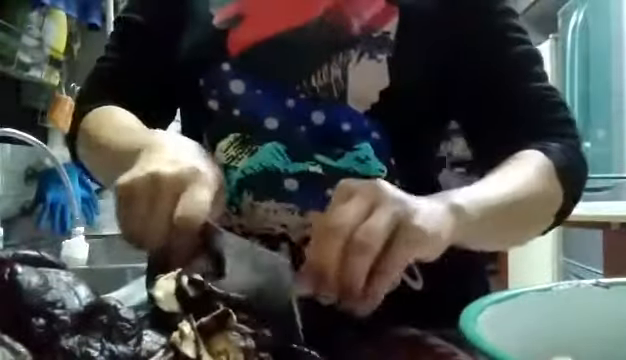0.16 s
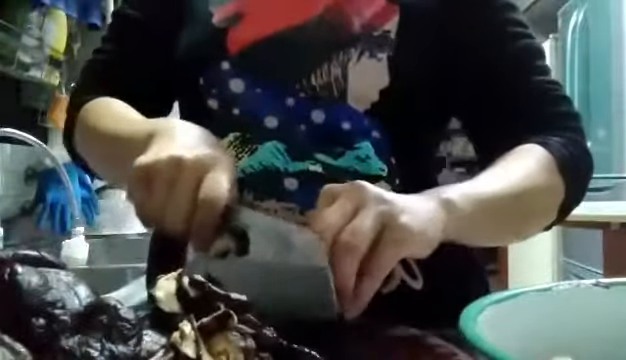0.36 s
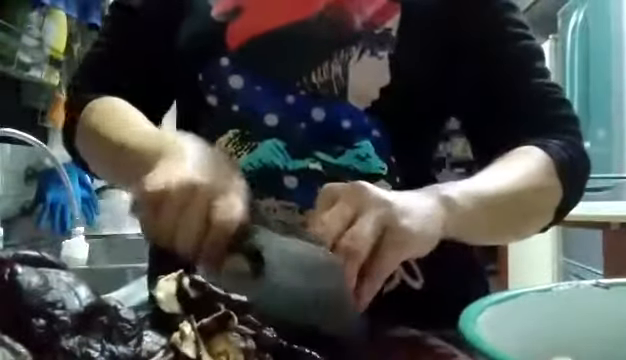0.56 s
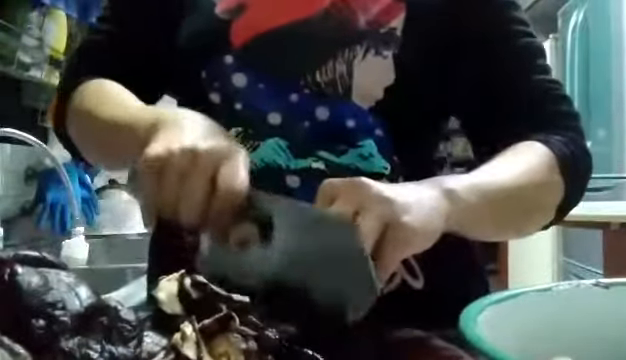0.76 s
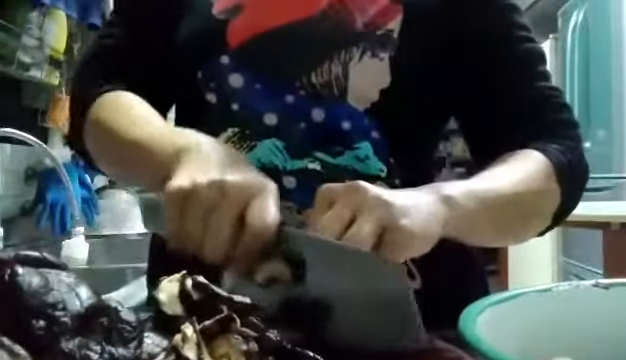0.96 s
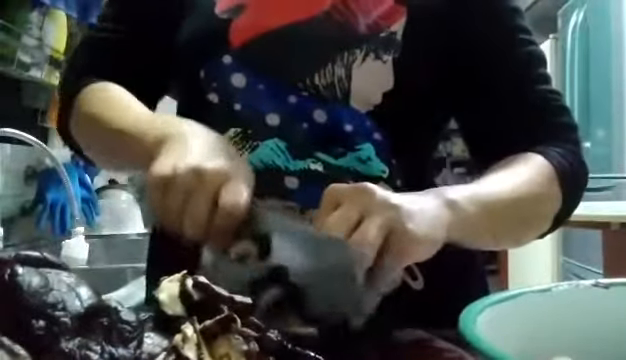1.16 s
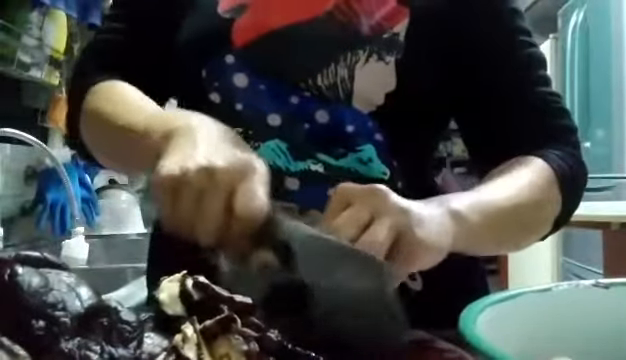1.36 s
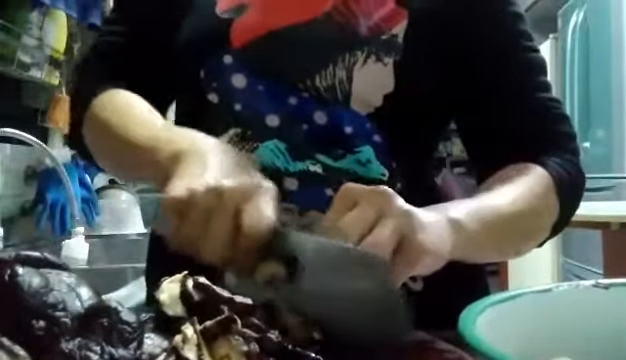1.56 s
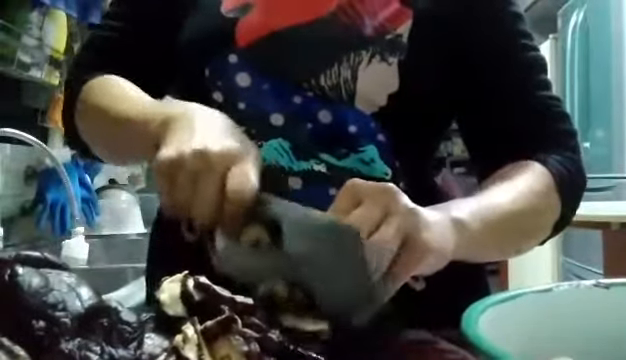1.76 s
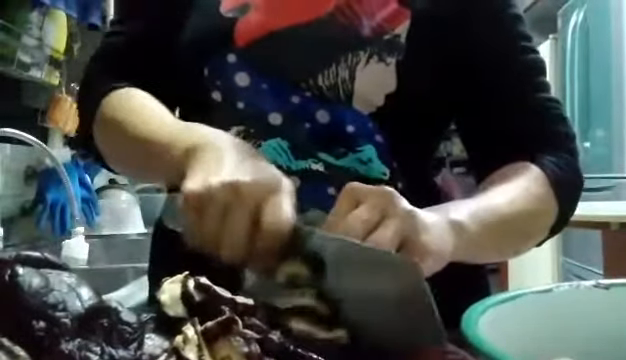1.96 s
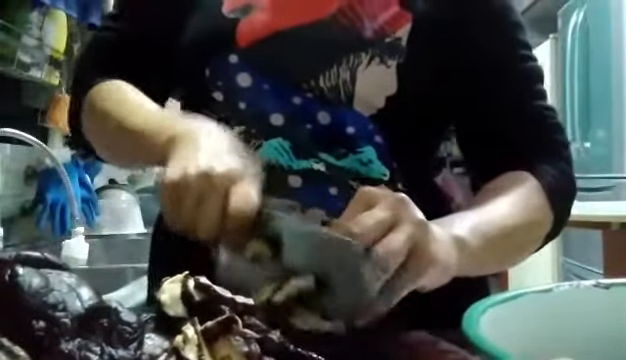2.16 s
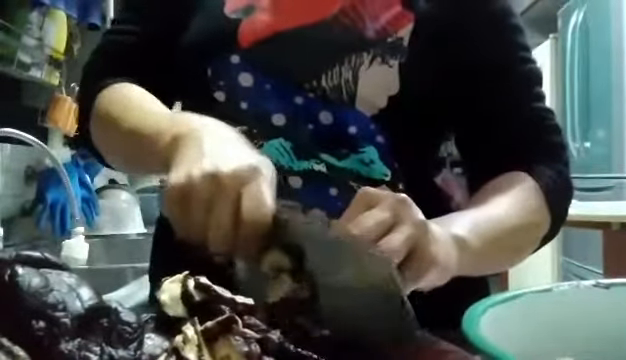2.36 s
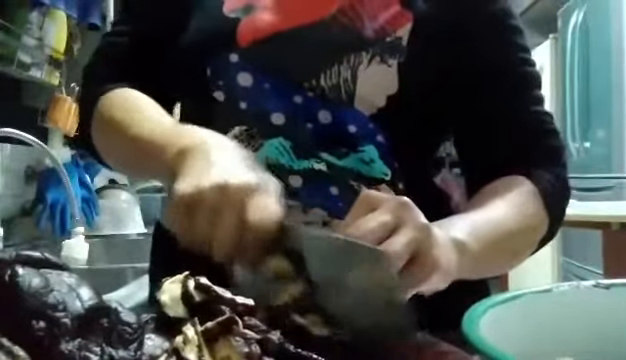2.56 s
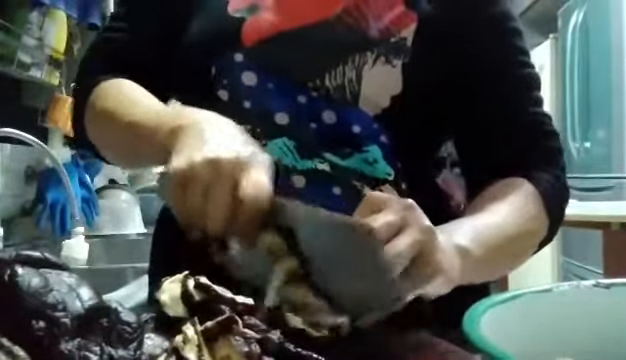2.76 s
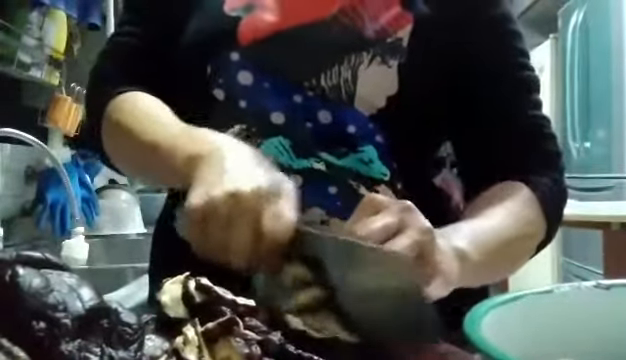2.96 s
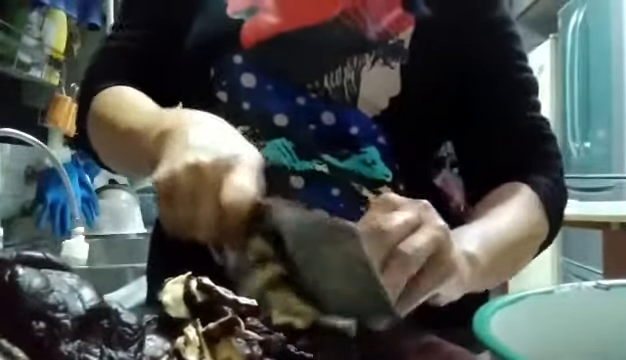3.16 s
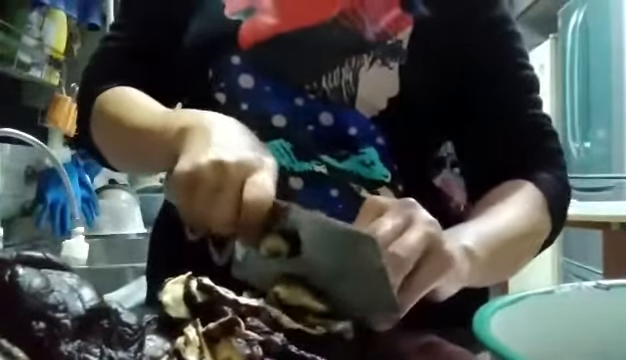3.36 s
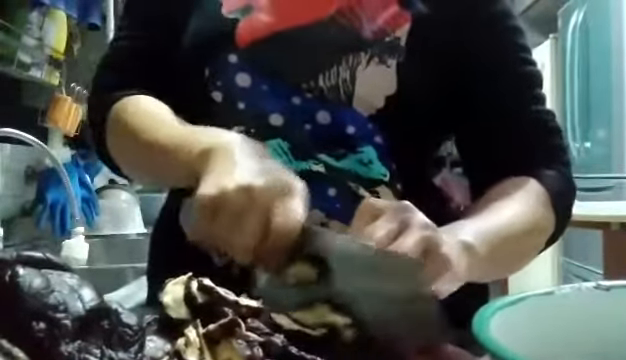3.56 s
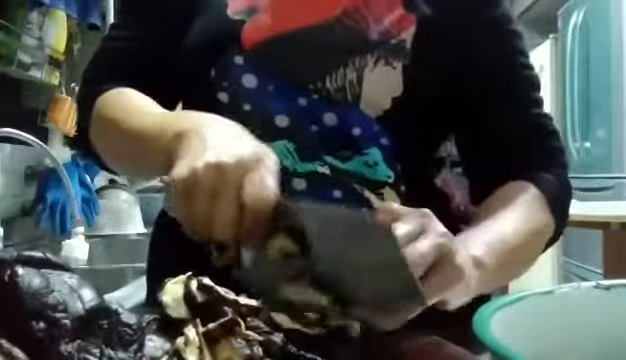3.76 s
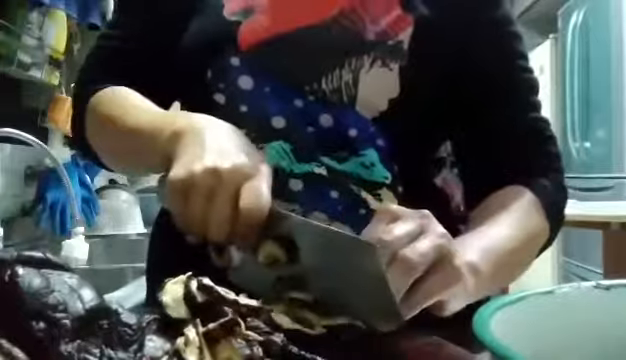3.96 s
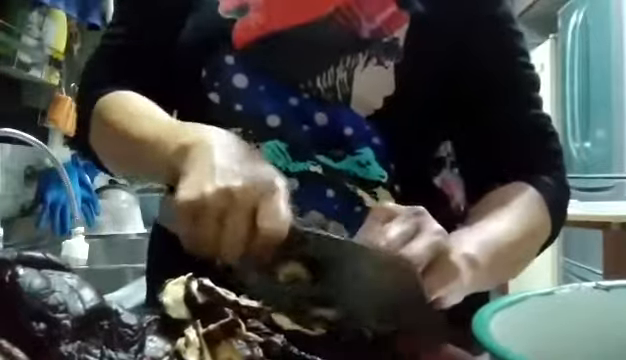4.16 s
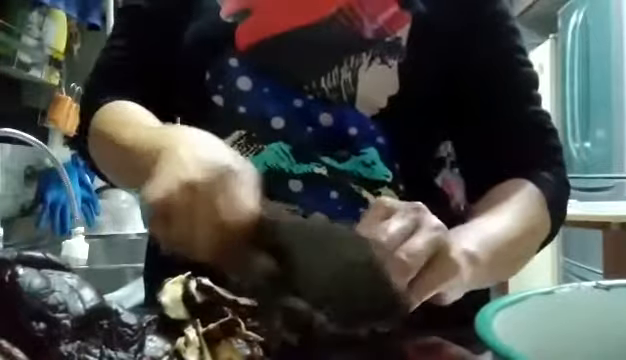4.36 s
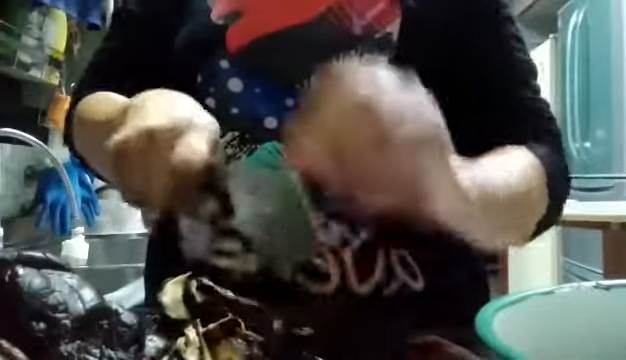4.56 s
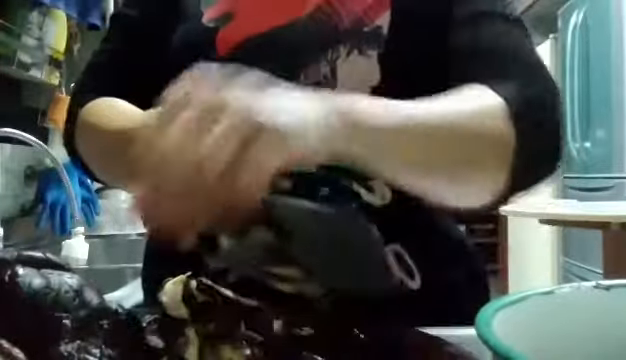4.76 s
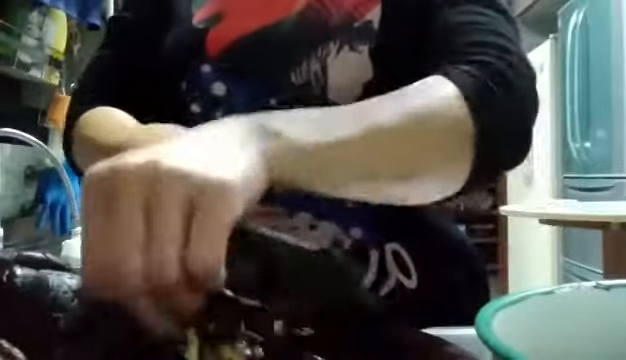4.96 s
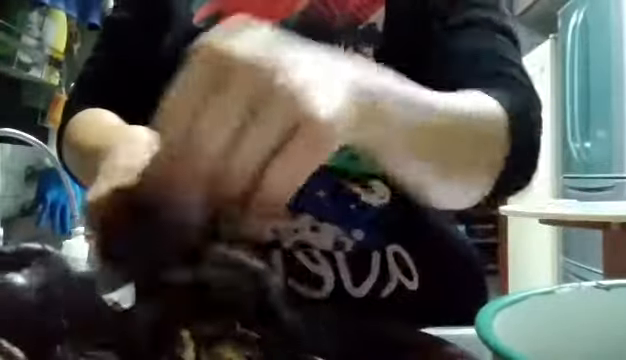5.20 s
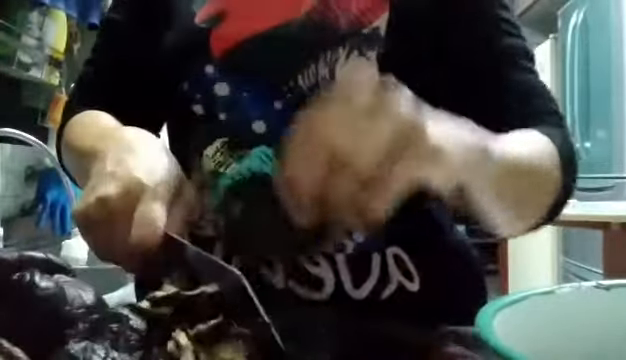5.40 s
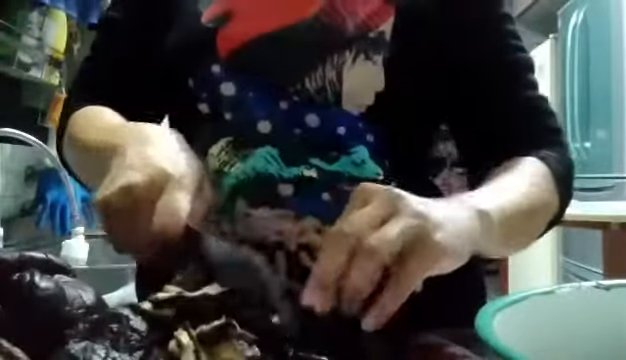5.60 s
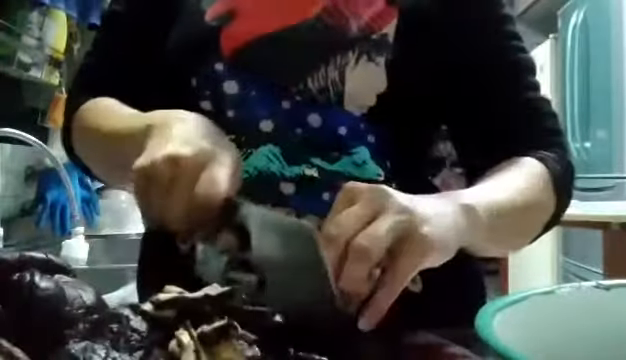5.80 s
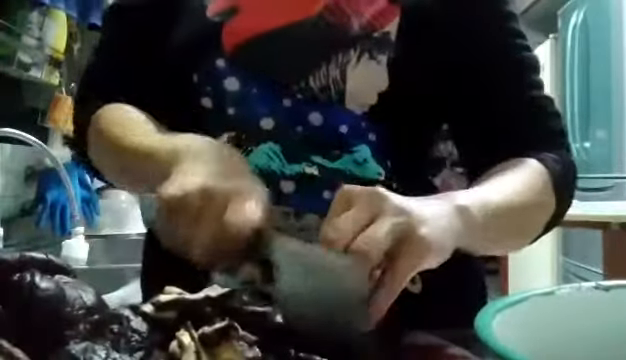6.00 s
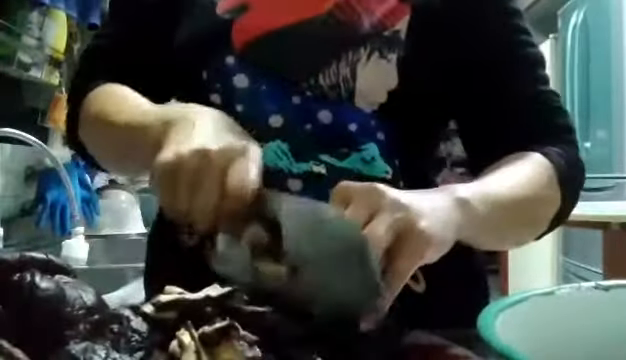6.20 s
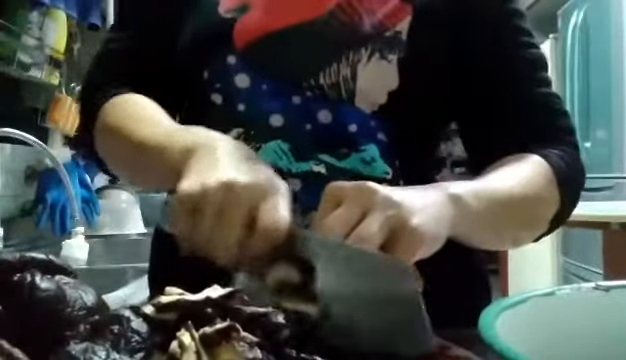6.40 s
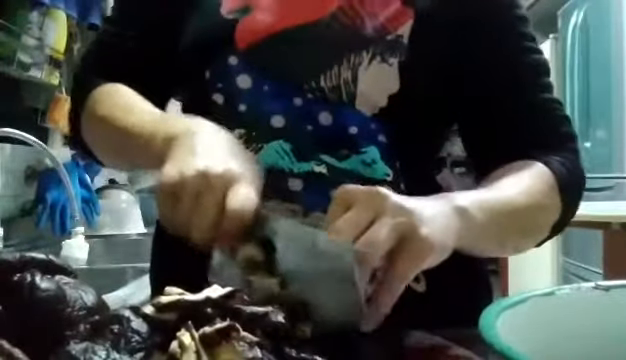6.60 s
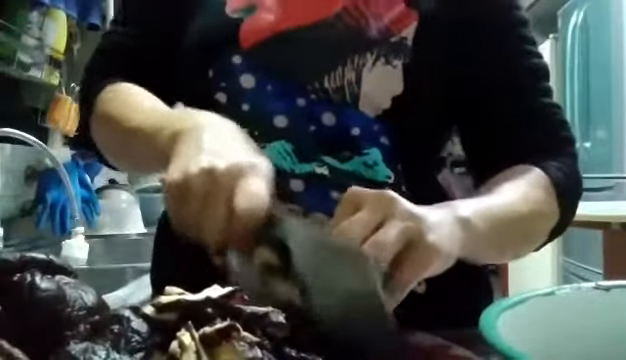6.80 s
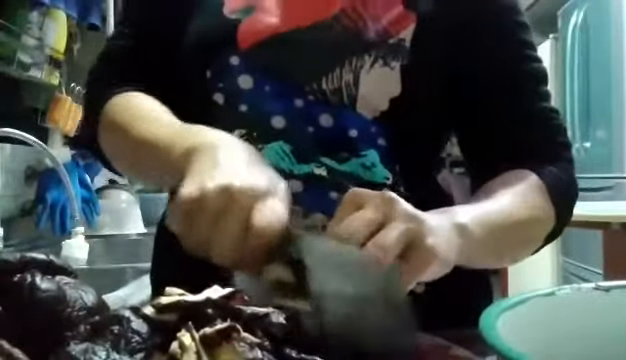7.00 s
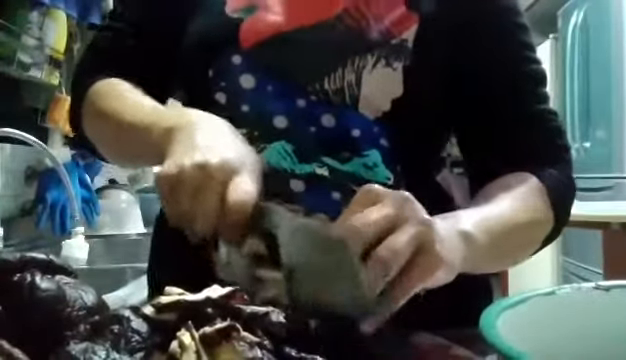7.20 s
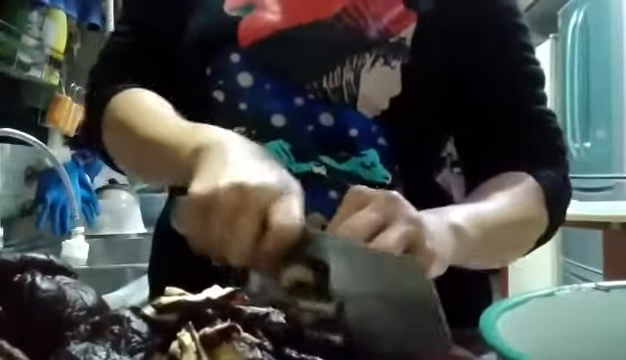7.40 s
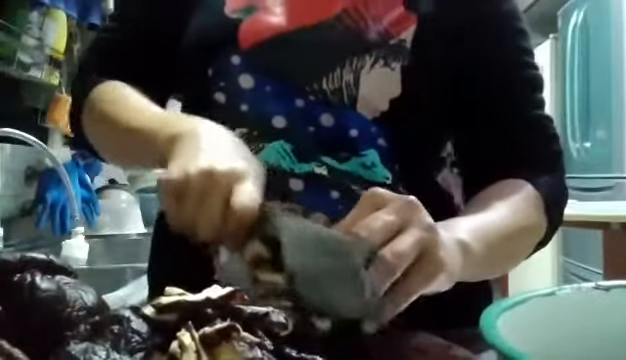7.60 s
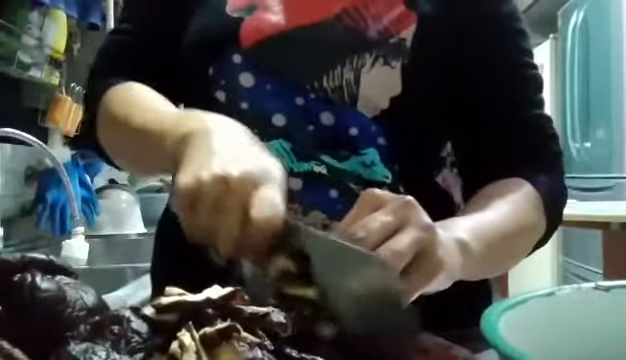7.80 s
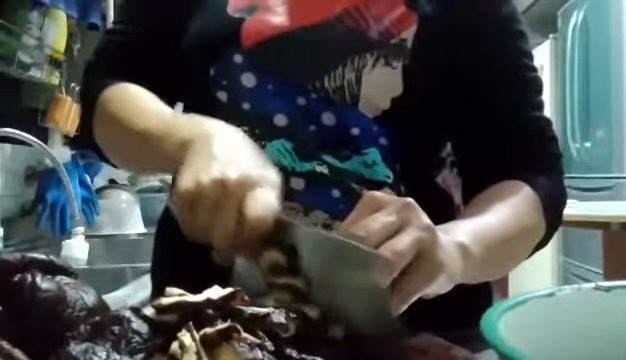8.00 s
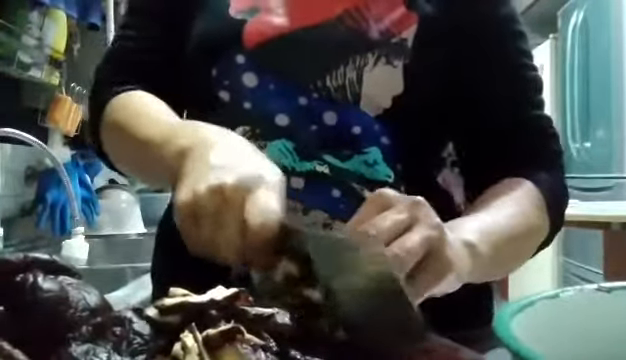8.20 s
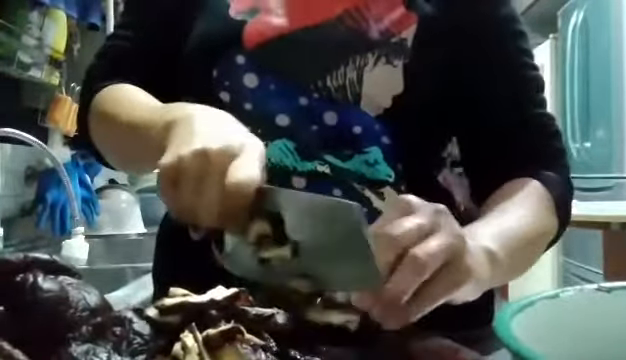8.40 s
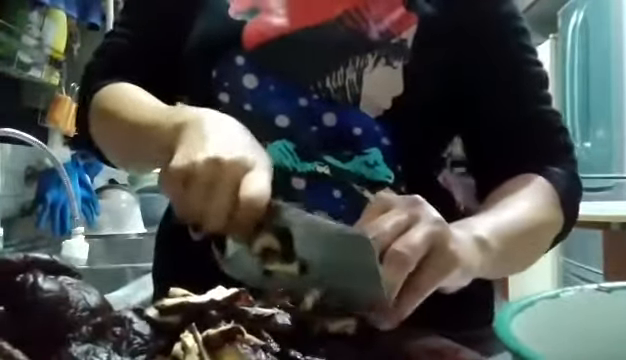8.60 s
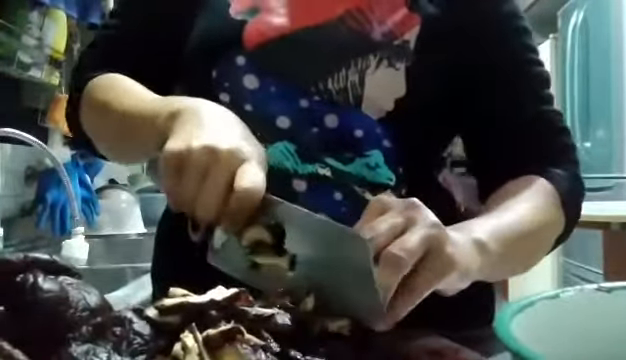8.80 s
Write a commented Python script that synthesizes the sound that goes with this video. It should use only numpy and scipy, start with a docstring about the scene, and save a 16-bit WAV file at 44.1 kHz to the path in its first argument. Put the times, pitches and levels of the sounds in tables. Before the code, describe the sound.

A heavy cleaver chops through mushrooms on a thick wooden board in two brisk, even runs, over a refrigerator's low hum.

```python
"""A small kitchen, the microphone close to a thick wooden board: a refrigerator hums (sines) over a
steady rush of air (coloured noise). A cleaver slices mushrooms: in each stroke the blade rasps into the
flesh (grainy noise), knocks on the board (decaying modes and noise bursts), drags on the wood and lifts
off, with scrapes, squeaks (wavering tones) and ticks of steel in between. Where the sum passes full
scale, it overloads the recorder."""
import sys
import numpy as np
from scipy import signal
from scipy.fft import rfft, irfft, next_fast_len
from scipy.io import wavfile

SR = 44100
rng = np.random.default_rng(int(sys.argv[2]) if len(sys.argv) > 2 else 0)


def transcribe(signal):
    """Save signal, clipped to [-1, 1], as a 16-bit WAV file at the path in sys.argv[1]."""
    frames = np.atleast_2d(signal).T
    limited = np.clip(frames, -1, 1)
    pcm = np.round(limited * 32767).astype(np.int16)
    wavfile.write(sys.argv[1], SR, pcm)


N = 390285
CUTOFF_HZ = 16000
T = np.arange(N) / SR
KNOCK_T = T[:SR // 2] - T[SR // 50]   # seconds around one contact, from 20 ms before it
KNOCK_N = len(KNOCK_T)
KNOCK_HZ = np.fft.rfftfreq(KNOCK_N, 1 / SR)
SIDES = np.array([[.5], [-.5]])   # left and right halves of a difference between the two ports


def from_db(db):
    """Decibels to gain."""
    return 10 ** (np.asarray(db) / 20)


def rms_one(x):
    """Scale to an rms of 1."""
    return x / np.sqrt(np.mean(x ** 2) + 1e-20)


def at_hz(points, hz):
    """Read a table on a log-frequency axis."""
    f, value = np.transpose(points)
    return np.interp(np.log(np.maximum(hz, 1)), np.log(f), value)


def noise(spectrum, likeness, size, top_hz=CUTOFF_HZ):
    """Stereo noise of a given colour and left-right likeness, rolling off above top_hz; rms 1."""
    padded = next_fast_len(size)
    hz = np.fft.rfftfreq(padded, 1 / SR)
    mid, side = rfft(rng.standard_normal((2, padded)))
    alike = np.clip(at_hz(likeness, hz), -.99, .99)
    pair = np.sqrt(1 + alike) * mid + np.sqrt(1 - alike) * side * [[1], [-1]]
    gain = from_db(at_hz(spectrum, hz)) / np.sqrt(1 + (hz / top_hz) ** 20)
    return rms_one(irfft(pair * gain, padded)[:, :size])


def dying(t60):
    """Envelope that falls 60 dB within t60 seconds of the contact, on either side of it."""
    return np.exp(-np.log(1000) * np.abs(KNOCK_T) / t60)


def swell(rise_s):
    """Envelope that is 0 until the contact and then grows towards 1."""
    return 1 - np.exp(-np.maximum(KNOCK_T, 0) / rise_s)


def resonate(x, peaks):
    """A sound together with the resonances that it drives."""
    out = x
    for hz, width_hz, db in peaks:
        b, a = signal.iirpeak(hz, hz / width_hz, fs=SR)
        out = out + from_db(db) * signal.lfilter(b, a, x + 1e-18)
    return out


def add(out, s, sound):
    """Lay a sound into the scene with its contact at s."""
    start = round((s + KNOCK_T[0]) * SR)
    out[:, start:start + KNOCK_N] += sound


# compressor orders and mains hum: pitch_hz, level_db (rms)
HUM = [(27.1, -57), (54.2, -53), (81.3, -37), (108.3, -54.5), (120, -38), (162.6, -65), (241, -50),
       (323, -54.5), (813, -62.5)]
# colour of the moving air in the room: frequency_hz, density_db (relative, per Hz)
AIR = [(15, -9), (33, -7), (50, 4.5), (70, 7), (95, 9), (140, -0.5), (300, -4.5), (480, -5), (800, -9),
       (1150, -15), (1500, -13.5), (3200, -21.5), (7500, -32.5), (9000, -39)]
# microphone hiss, peaking near 9600 Hz: frequency_hz, density_db (relative, per Hz)
HISS = [(6000, -22), (8500, -9.5), (9600, -2.5), (10600, -10), (11800, -25.5), (13500, -45)]
# left-right likeness of sound from all around the room: frequency_hz, likeness (-1 to 1)
ROOM_LIKENESS = [(60, 0.975), (100, 0.98), (180, 0.93), (300, 0.91), (520, 0.4), (890, 0.04), (1520, -0.32),
                 (2600, -0.0)]
AIR_DB, HISS_DB = -38, -59   # rms


def background():
    """Steady hum, the same at both ports, over moving air and microphone hiss."""
    hum = 0
    for hz, db in HUM:
        hum = hum + np.sqrt(2) * from_db(db) * np.sin(2 * np.pi * (hz * T + rng.random()))
    air = from_db(AIR_DB) * noise(AIR, ROOM_LIKENESS, size=N, top_hz=10100)
    hiss = from_db(HISS_DB) * noise(HISS, ROOM_LIKENESS, size=N)
    return hum + air + hiss


def grains(per_s, spread_db):
    """Uneven gain of fibres snapping one after another; rms 1."""
    unevenness = np.interp(T * per_s, np.arange(N), rng.standard_normal(N))
    return rms_one(from_db(spread_db * unevenness))


def crackles(per_s=220, spread_db=3.0, low_hz=2500, high_hz=6300):
    """Single fibres part with tiny, soft-edged clicks: random impulses through a band-pass; rms 1."""
    happens = rng.random(N) < per_s / SR
    strength = from_db(spread_db * np.clip(rng.standard_normal(N), -2, 2))
    clicks = happens * strength * rng.choice([-1, 1], N)
    band = signal.butter(6, [low_hz, high_hz], "band", fs=SR, output="sos")
    return rms_one(signal.sosfilt(band, clicks + 1e-18))


# colour of parting flesh: frequency_hz, density_db (relative, per Hz)
FLESH = [(200, 5), (900, 10.5), (2000, -3), (3300, 12.5), (4300, -1), (5400, -7), (7000, -20.5),
         (9600, 4.5), (10800, -11), (12000, -43), (15000, -51)]
# narrow peaks in the rasp of parting flesh: pitch_hz, width_hz, level_db
FLESH_PEAKS = [(1950, 340, 5), (4010, 69, 16), (5500, 150, 14), (6200, 370, 6)]
# colour of steel rubbing on wood: frequency_hz, density_db (relative, per Hz)
WOOD = [(200, -32), (480, 8), (1100, -3), (1750, 5.5), (2400, -6.5), (3400, -6), (4500, -9), (7000, -12.5),
        (9800, -4.5), (11500, -26), (14000, -51)]
# resonances of the blade as it drags on wood: pitch_hz, width_hz, level_db (before ring_db)
BLADE = [(490, 69, 5), (1744, 89, 9), (2320, 77, 9), (2810, 170, 15.5), (3270, 86, -1), (3930, 84, 3),
         (4560, 100, 18)]
# likeness of the close sounds, which reach the two ports out of step in the middle range:
# frequency_hz, likeness (-1 to 1)
CLOSE_LIKENESS = [(100, 0.85), (300, 0.96), (700, 0.19), (1400, -0.48), (2300, 0.12), (4000, -0.17),
                  (10000, -0.019)]


def rasps(passes, ring_db, flesh_db=-6.0, wood_db=0.0, crackle_db=-12):
    """Fibres snap in quick clumps as the blade passes; on wood the rub is darker and rings the blade."""
    flesh, wood = np.zeros(N), np.zeros(N)
    for s, db, rise_s, fall_s, on_wood_db in passes:
        near = slice(max(int(s * SR) - SR // 4, 0), int(s * SR) + SR // 4)
        t = T[near] - s
        rise = np.exp(-.5 * (t / rise_s) ** 2)
        fall = np.exp(-np.abs(t) / fall_s)
        envelope = from_db(db) * np.where(t < 0, rise, fall)
        flesh[near] += envelope
        wood[near] += envelope * from_db(on_wood_db)
    snaps = grains(per_s=1500, spread_db=5) * grains(per_s=350, spread_db=2.5)
    cut = from_db(flesh_db) * flesh * snaps * noise(FLESH, CLOSE_LIKENESS, size=N)
    rub = from_db(wood_db) * wood * snaps * noise(WOOD, CLOSE_LIKENESS, size=N)
    grit = from_db(crackle_db) * flesh * crackles()
    ringing_blade = [(hz, width_hz, db + ring_db) for hz, width_hz, db in BLADE]
    return grit + resonate(cut, FLESH_PEAKS) + resonate(rub, ringing_blade)


# strokes of the cleaver, close to the microphone: knock_s, force_db, knock_pitch_factor,
# nine colours of the knock: thump_db, knock_db, upper_knock_db, hollow_ring_db, blade_clack_db,
# edge_bite_db, clink_db, crunch_db, crisp_top_db,
# then room_db and the three rubs: entry_db, drag_db, lift_db (before the gains in rasps)
STROKES = [(0.5159, 1, 0.91, -0.5, -0.5, -2.5, 1.5, 0.5, 4.5, 3.5, 5.5, 7.5, 1, -60, -59, -62),
           (0.866, -7, 0.93, 4, 0, 6, -5, 1.5, -6, -14, -4, 3, 0, -36, -50, -49),
           (1.186, 0.5, 0.93, 1.5, 3, 3, -2, -1, -6, 2.5, 1, 2, 0.5, -46, -43, -54),
           (1.5176, 3.5, 0.95, -0.5, -1.5, -1, -3, -3.5, -6.5, -12, -6, -3, -0.5, -47.5, -43.5, -64),
           (1.86, -2, 0.97, 3.5, 0.5, 5, 1.5, -1.5, -2.5, -2, -3, 2, -1.5, -43.5, -45.5, -46),
           (2.18, 4, 0.93, 3, 0.5, 2, 5, -0.5, 5.5, 8.5, 7.5, 12.5, 0, -40.5, -46, -59),
           (2.553, 3.5, 0.93, 2, 1.5, 1, 3.5, -2.5, -1, -2, -1.5, 3.5, -2, -48, -44.5, -60),
           (2.901, 4, 0.88, 2, 0, 5, 4.5, 2.5, 2.5, 4.5, 2, -6, -2, -49, -40.5, -48),
           (3.516, 2.5, 0.99, 1, 1.5, -3, -1, -4.5, -12, -1, -0.5, -1.5, -2.5, -58, -38.5, -37.5),
           (4.1281, 1.3, 0.88, 2.5, -2, -1.5, 4, 2, -2, 2.5, -5.5, -7, -3.5, -60, -44.5, -52),
           (5.9441, 7, 0.925, -1.5, 2, -5.5, 1.5, -0.5, 2.5, 4.5, 0, 8, -1.5, -60, -49, -56),
           (6.297, 2.5, 0.98, -1, 3, -4, -5, -3.5, -3.5, -7, -4, -2, -2, -55, -51, -44),
           (6.6188, 0.5, 0.93, 2, 1.5, 0, -1.5, -2.5, -12.5, -3, -2, 1, 0.5, -50, -41, -48),
           (6.9233, 4.5, 0.98, 4, 0.5, 1.5, 1.5, 3, 8.5, 12, 7.5, 15, -0.5, -41, -45, -59),
           (7.29, -2, 0.93, 4, 0.5, 5.5, -3, 3, 3.5, 2.5, 0, 0, -1.5, -50, -41, -37),
           (7.659, -2.5, 0.93, 4, 0, 5, 4, 0, -2, 4, -2, 0, -0.5, -59, -47.5, -47),
           (8.0052, 0, 0.89, 3.5, -3, 5, -1.5, 1.5, 1, 5.5, -4, -2, -2, -49, -41.5, -41)]
# shape of each rub: rise_s, fall_s, wood_db (offset of the rub on wood, before the gains in rasps)
ENTRY = (0.0041, 0.012, -4)
DRAG = (0.027, 0.038, -8.5)
LIFT = (0.0055, 0.016, -16)
# the blade enters before the knock, closer to it when the stroke is harder
ENTRY_LEAD_S, ENTRY_SHORTER_S_PER_DB = 0.071, .0014
DRAG_LAG_S = 0.024
# a longer pull over the board ends later and louder than the usual lift
LIFT_LAG_S, LIFT_USUAL_DB, LIFT_LATER_S_PER_DB = 0.101, -45, .0015


def stroke_rasps():
    """Every stroke rubs three times, on entry, drag and lift; mushroom damps the ringing blade."""
    passes = []
    for s, force_db, *_, entry_db, drag_db, lift_db in STROKES:
        entry_s = s - ENTRY_LEAD_S + ENTRY_SHORTER_S_PER_DB * force_db
        lift_s = s + LIFT_LAG_S + LIFT_LATER_S_PER_DB * (lift_db - LIFT_USUAL_DB)
        passes.append((entry_s, entry_db, *ENTRY))
        passes.append((s + DRAG_LAG_S, drag_db, *DRAG))
        passes.append((lift_s, lift_db, *LIFT))
    return rasps(passes, ring_db=-2.5)


# colour of the crunch and bite: frequency_hz, density_db (relative, per Hz)
CRACK = [(40, -24), (150, -49), (400, -5.5), (1400, 10), (2200, 3), (3000, -7), (5000, -26), (7000, -50),
         (9800, -26), (12500, -72)]


def crack(level_db=-14, t60=0.043, rise_s=0.00024, crunch_db=-17, crunch_t60=0.011):
    """The edge crunches through the last flesh, then bites the wood: a burst too dense for single modes."""
    crunch = from_db(crunch_db) * dying(crunch_t60) * (KNOCK_T < 0)
    bite = dying(t60) * swell(rise_s)
    return from_db(level_db) * noise(CRACK, CLOSE_LIKENESS, size=KNOCK_N) * (crunch + bite)


# the steel edge snapping onto bare wood: frequency_hz, density_db (relative, per Hz)
SNAP = [(2500, -22), (4000, -15), (5300, 12.5), (6500, -7), (8000, -5.5), (10000, -8), (13000, -44)]


def snap(level_db=-32.0, t60=0.0088, rise_s=0.00067, likeness=1.0):
    """A very short, bright tick of steel at the instant of contact."""
    tick = noise(SNAP, [(CUTOFF_HZ, likeness)], size=KNOCK_N)
    return from_db(level_db) * tick * dying(t60) * swell(rise_s)


# modes of board and cleaver, the last few weak but ringing on:
# pitch_hz, level_db (before the blow's colour), t60_s, left_minus_right_db, left_lead_rad
MODES_OF_BOARD = [(53.5, -25, 0.071, -2.5, 1), (204.6, -18.5, 0.058, -0.5, 0.5),
                  (248, -19.5, 0.069, -2.5, 6.5), (284, -19, 0.12, 0.5, 0.67), (349.3, -22.5, 0.076, 8, 6),
                  (482.5, -33, 0.17, -3, 0.7), (569, -23.5, .075, -15, 3), (630.5, -22.5, 0.14, 2.5, 2.53),
                  (689, -18.5, 0.066, 2.5, -1.3), (746, -18, 0.088, -12.5, -.5),
                  (806.3, -15.5, 0.068, -4, -1.5), (867, -30.5, .085, 9, -6),
                  (936.5, -17.5, 0.083, 0.5, -4), (1073, -37.5, 0.044, -9.5, -7.5),
                  (1223, -11, 0.036, -2.5, -2.5), (1311, -13.5, 0.056, -2.5, 0.42),
                  (1370, -11.5, 0.049, -3.5, 4.5), (1432, -16.5, 0.05, 1.5, 4.5),
                  (1504, -23, 0.064, 13.5, -1.6), (1660, -20, 0.02, -3.5, 2),
                  (1823, -22.5, .033, -9.5, -1.5), (1942, -29, 0.029, 10, -1), (2062, -20, 0.046, -5, 3),
                  (2145, -20.5, 0.034, -8.5, 3), (2222, -20, 0.042, -3.5, 1.35),
                  (2496, -26.5, 0.016, -16, 1), (3216, -26.5, 0.023, 21, 3),
                  (3840, -32.5, 0.033, 2.5, 10.5), (4204, -26, 0.019, 4, 2.5), (5220, -35, 0.01, 12, -2.5),
                  (222.7, -44, 0.41, -2, -0.5), (737, -33, 0.22, -14, 0.5), (1370, -37.5, 0.33, -10, 2.5),
                  (1510, -51, 0.24, 6, 1), (2240, -45, .31, -5, -1), (2345, -54, 0.26, -2, -0.5)]


def board(colour, knock_pitch, knock_hz, reach_hz=70, scatter_db=1.5, detune=0.00574,
          contact_s=0.00045, whole_board_hz=420):
    """A blow rings every mode by its own path to each port; the pressing blade retunes those near the knock."""
    out = 0
    for k, (hz, db, t60, pan_db, lead) in enumerate(MODES_OF_BOARD):
        strength, shift = rng.standard_normal(2)
        pitch = knock_pitch ** np.exp(-((hz - knock_hz) / reach_hz) ** 2)
        phase = 2 * np.pi * hz * pitch * (1 + detune * shift) * KNOCK_T + lead * SIDES
        gain = from_db(db + at_hz(colour, hz) + scatter_db * strength + pan_db * SIDES)
        # below whole_board_hz all modes share one sign before their leads; above it the sign alternates
        sign = -1 if hz < whole_board_hz else (-1) ** k
        out = out + sign * gain * np.sin(phase) * dying(t60)
    return out * swell(contact_s)


# the kitchen's answer to a knock: frequency_hz, density_db (relative, per Hz)
ECHO = [(30, 1.5), (130, -15.5), (290, 8), (450, -8.5), (620, -3), (740, 1), (1050, -15), (1440, -0.5),
        (1750, -14.5), (2050, -8), (2380, -7), (2750, -31), (3200, -17), (5000, -32.5), (7000, -44),
        (9800, -37), (13000, -78)]
# how long that answer lasts: frequency_hz, t60_s
ECHO_T60 = [(60, 0.45), (300, 0.36), (750, 0.41), (1400, 0.51), (2300, 0.39), (4000, 0.25), (10000, 0.28)]


def kitchen(level_db=-27, build_s=0.0051):
    """Diffuse reflections build up, then die away at each frequency band's own pace."""
    wash = rfft(noise(ECHO, ROOM_LIKENESS, size=KNOCK_N))
    centres, t60s = np.transpose(ECHO_T60)
    out = 0
    for share, t60 in zip(np.eye(len(centres)), t60s):
        weight = at_hz(np.column_stack([centres, share]), KNOCK_HZ)   # overlapping bands, adding up to 1
        out = out + irfft(wash * weight, KNOCK_N) * dying(t60)
    return from_db(level_db) * out * swell(build_s)


def tinted(x, colour):
    """A sound as coloured by one blow."""
    return irfft(rfft(x) * from_db(at_hz(colour, KNOCK_HZ)), KNOCK_N)


def chops(thump_hz=330, knock_hz=705, upper_knock_hz=800, hollow_hz=1210, clack_hz=1370,
          edge_hz=2200, clink_hz=2650, crunch_hz=3300, crisp_hz=5200, moved_db=-3):
    """A stroke cushioned by mushroom is dull, one on bare wood bright; the spot struck favours some modes."""
    out, room = np.zeros((2, N + KNOCK_N)), kitchen()
    colour_hz = (thump_hz, knock_hz, upper_knock_hz, hollow_hz, clack_hz,
                 edge_hz, clink_hz, crunch_hz, crisp_hz)
    for s, force_db, knock_pitch, *colour_db, room_db, _, _, _ in STROKES:
        colour = list(zip(colour_hz, colour_db))
        # mostly the same paths, some changed by the moving hands
        echo = from_db(room_db) * (room + from_db(moved_db) * kitchen())
        knock = board(colour, knock_pitch, knock_hz) + tinted(snap() + crack() + echo, colour)
        add(out, s, from_db(force_db) * knock)
    return out[:, :N]


# the blade grinds through a tough piece or scrapes the slices aside:
# peak_s, level_db, rise_s, fall_s, wood_db (levels before the gains in rasps)
SCRAPES = [(0.786, -38, .002, .008, -11), (0.893, -44.5, 0.0044, 0.008, -3), (2.175, -39, .004, 0.0031, -3),
           (2.245, -38.5, 0.011, .018, -6), (3.582, -42.5, 0.0088, 0.01, -7), (4.198, -48, .012, .02, -4),
           (4.253, -36, 0.0045, 0.011, 0.5), (4.264, -39, 0.005, 0.0064, 5),
           (4.947, -32, 0.0017, .005, -10), (6.305, -38, 0.0022, .005, -8),
           (6.388, -40, 0.0056, 0.013, -5.5), (7.331, -58, .005, 0.0087, -10), (8.03, -50, .006, .012, -9)]


def scrapes():
    """Extra passes of the blade through flesh and over wood, ringing it more than the strokes do."""
    return rasps(SCRAPES, ring_db=-0.5)


# wet skin squeaks against the steel: peak_s, pitch_hz (centre), level_db (before roughness), half_length_s
SQUEAKS = [(0.793, 5430, -36, 0.006), (0.798, 4860, -44, 0.015), (1.136, 5600, -47, 0.011),
           (1.461, 5550, -48, 0.008), (1.467, 6250, -49, .007), (1.78, 5370, -52, .009),
           (2.115, 5650, -49, 0.0037), (6.395, 5700, -52, .012), (8.137, 6200, -50, .009)]


def squeaks(waver=0.061, wavers_per_s=900, rough_db=3, catches_per_s=260, broken_db=4.0):
    """Wet skin sticks and slips: a brief, high tone of unsteady pitch, made uneven as the skin catches."""
    out = np.zeros((2, N + KNOCK_N))
    for s, hz, db, half_s in SQUEAKS:
        slip, grip, catch = (
            np.interp((KNOCK_T - KNOCK_T[0]) * rate, np.arange(KNOCK_N), rng.standard_normal(KNOCK_N))
            for rate in (wavers_per_s, wavers_per_s, catches_per_s))
        phase = 2 * np.pi * np.cumsum(hz * (1 + waver * slip)) / SR + np.pi / 2 * SIDES
        gain = from_db(db + rough_db * grip + broken_db * np.tanh(2 * catch))
        envelope = np.exp(-.5 * (KNOCK_T / half_s) ** 2)
        add(out, s, gain * envelope * np.sin(phase))
    return out[:, :N]


def with_walls(x, level_db=-11, t60=.28, build_s=.003):
    """A small, bright sound together with its faint reflections from the hard walls."""
    tail = rng.standard_normal((2, KNOCK_N)) * dying(t60) * swell(build_s)
    tail = tail[:, KNOCK_T >= 0] / np.sqrt(np.sum(tail ** 2) / 2)
    return x + from_db(level_db) * signal.fftconvolve(x, tail, axes=1)[:, :N]


# the free blade ticks against the board as it lifts, skips sideways or is set down:
# contact_s, level_db (relative), board_db (weight on the board)
TICKS = [(1.283, -45, -11), (3.626, -34.5, -11), (3.639, -41, -11), (4.247, -36, -3), (4.253, -28, -2),
         (4.2605, -34, 0), (4.268, -28.5, -10), (4.9419, -29.5, -2), (6.398, -41, -11), (7.405, -43, -11),
         (8.136, -34, -11)]


def ticks(t60=0.026, rise_s=0.00018, ring_db=-5.0, room_db=6):
    """A light touch of steel: a short click that rings the blade and stirs the board and the room."""
    out = np.zeros((2, N + KNOCK_N))
    ringing_blade = [(hz, width_hz, db + ring_db) for hz, width_hz, db in BLADE]
    for s, db, board_db in TICKS:
        click = noise(WOOD, CLOSE_LIKENESS, size=KNOCK_N) * dying(t60) * swell(rise_s)
        steel = resonate(click, ringing_blade)
        wood = board([(CUTOFF_HZ, board_db)], knock_pitch=1, knock_hz=0)
        add(out, s, from_db(db) * (steel + wood + from_db(room_db) * kitchen()))
    return out[:, :N]


def scene():
    """The humming kitchen with rasps, knocks, scrapes, squeaks and ticks close to the microphone."""
    cutting = stroke_rasps() + scrapes() + squeaks()
    return background() + with_walls(cutting) + chops() + ticks()


def record(dry, low_cut_hz=28):
    """Anything beyond full scale clips; then the deepest bass and the top are cut."""
    clipped = np.clip(dry, -1, 1)
    low_cut = signal.butter(2, low_cut_hz, "high", fs=SR, output="sos")
    top_cut = signal.cheby2(12, 70, CUTOFF_HZ, fs=SR, output="sos")   # 70 dB down from CUTOFF_HZ up
    return signal.sosfilt(top_cut, signal.sosfilt(low_cut, clipped))


dry = scene()
out = record(dry)
transcribe(out)
```